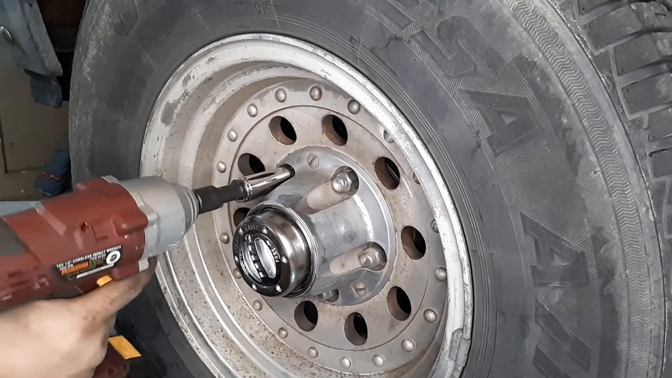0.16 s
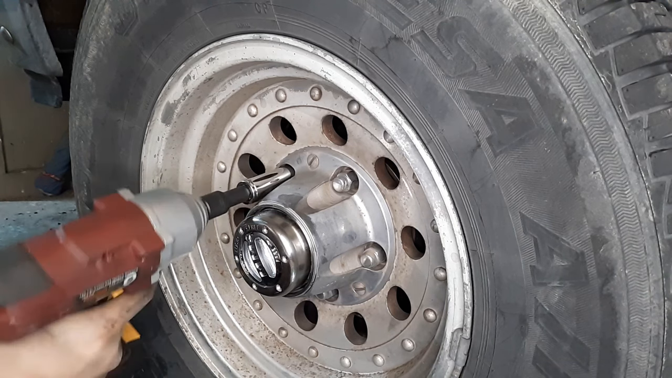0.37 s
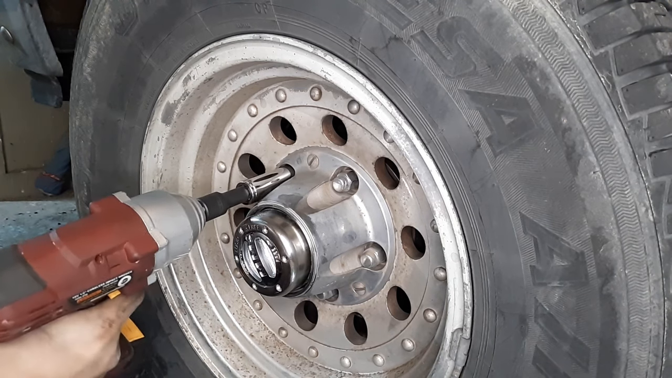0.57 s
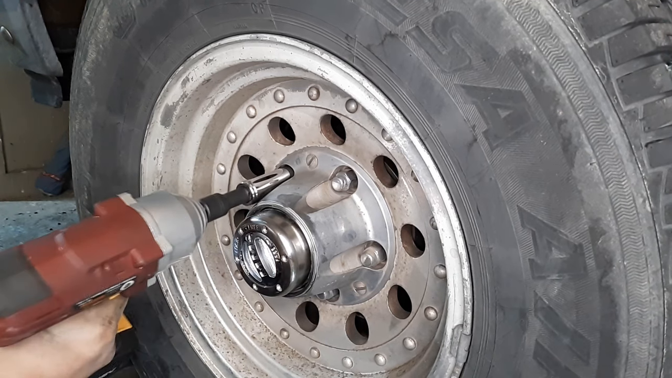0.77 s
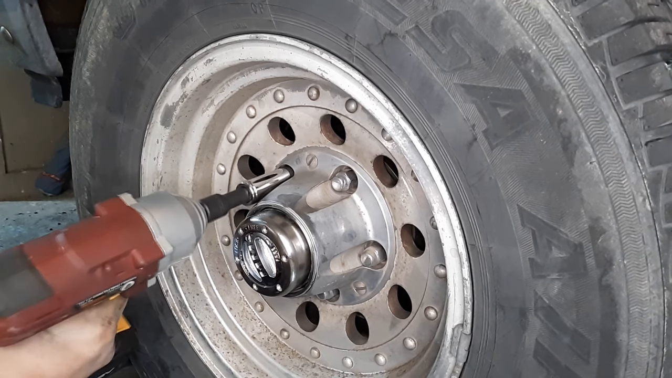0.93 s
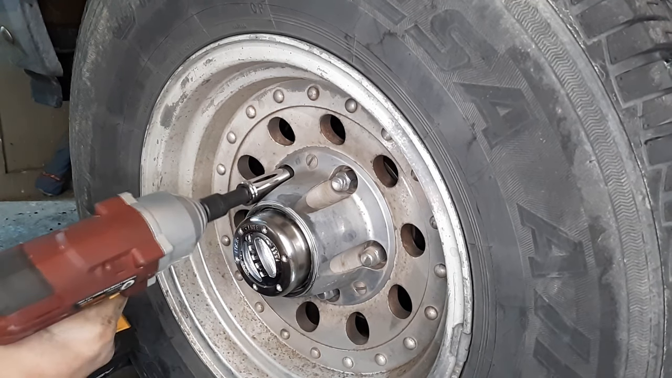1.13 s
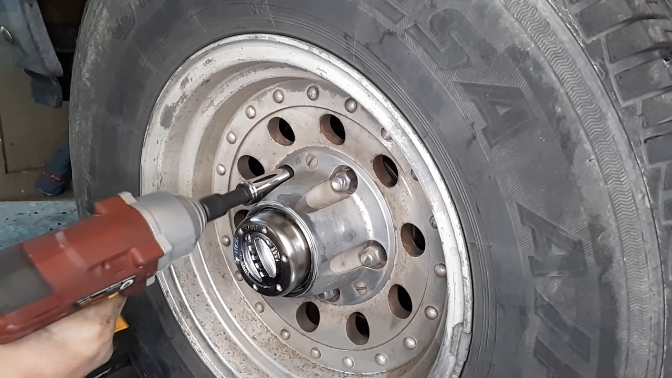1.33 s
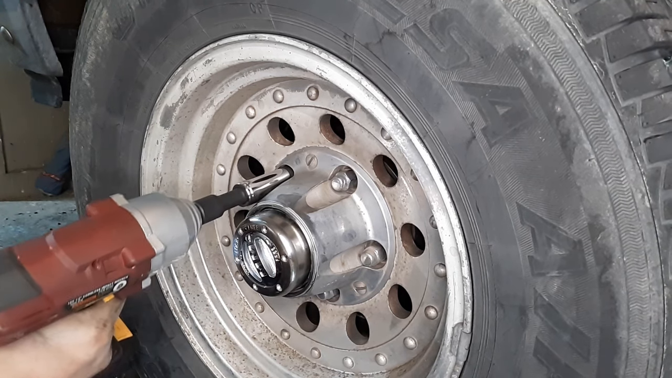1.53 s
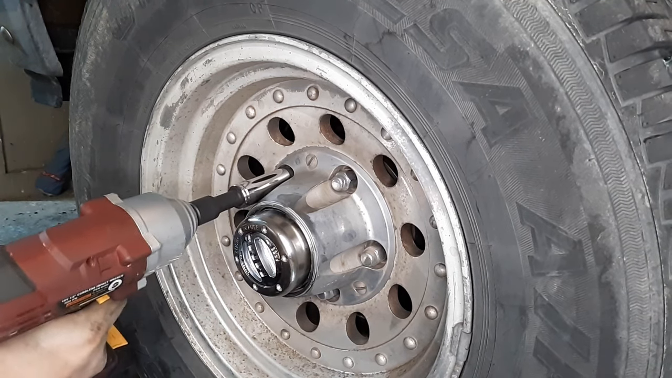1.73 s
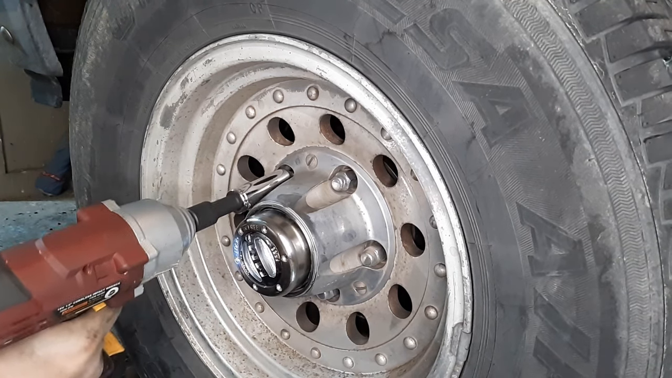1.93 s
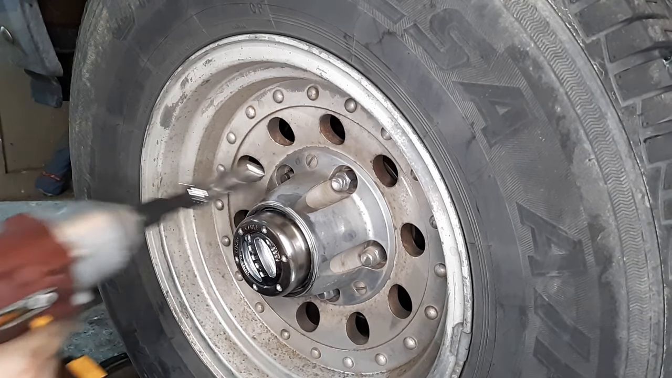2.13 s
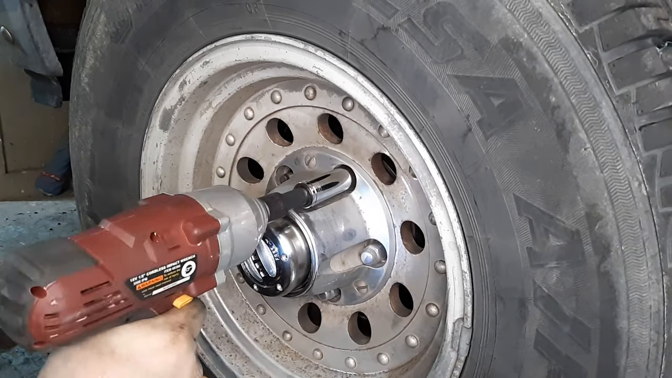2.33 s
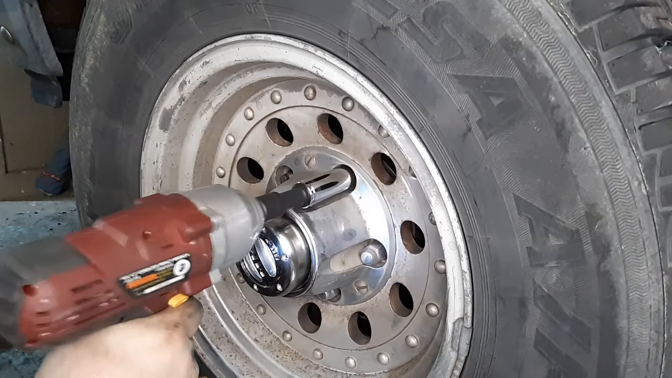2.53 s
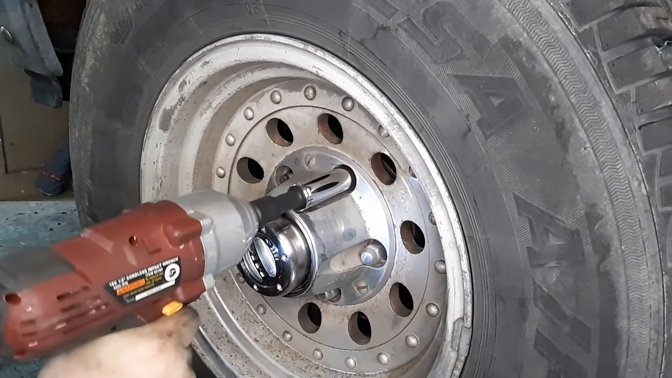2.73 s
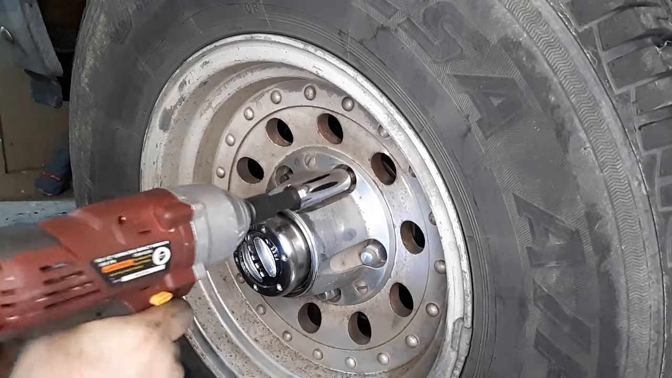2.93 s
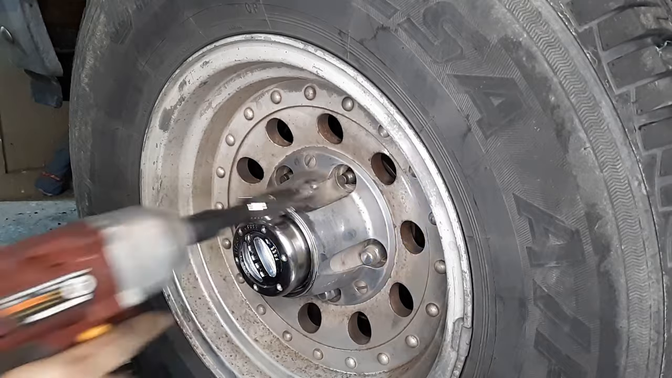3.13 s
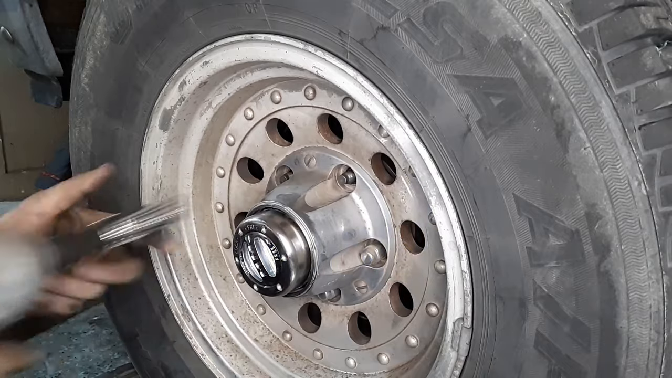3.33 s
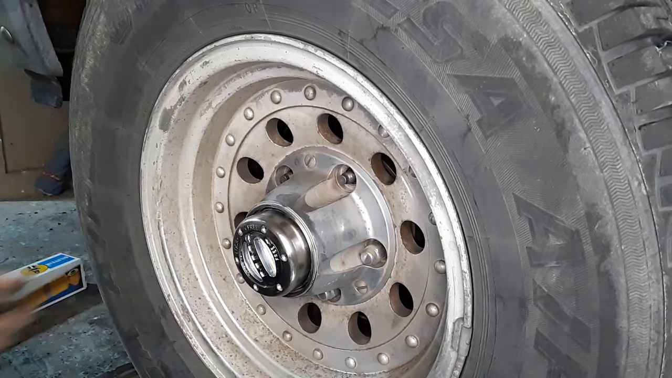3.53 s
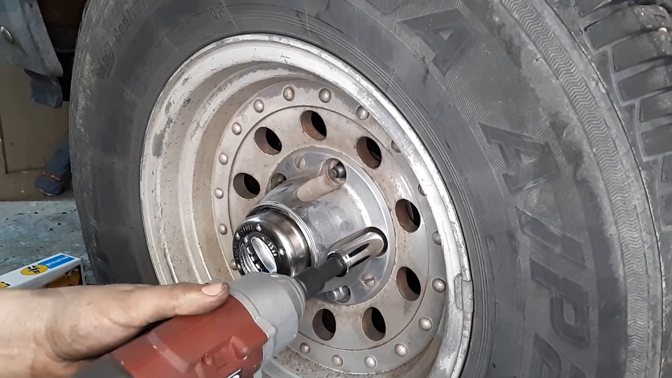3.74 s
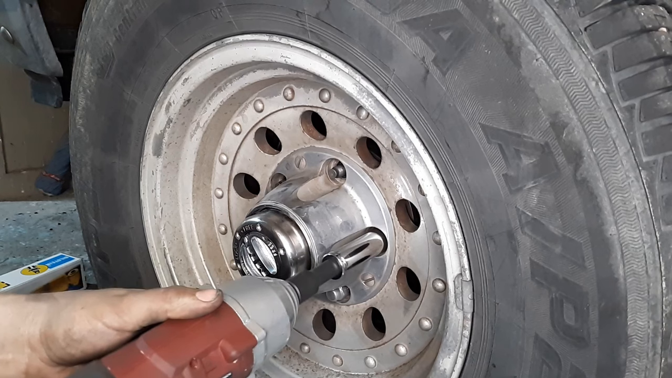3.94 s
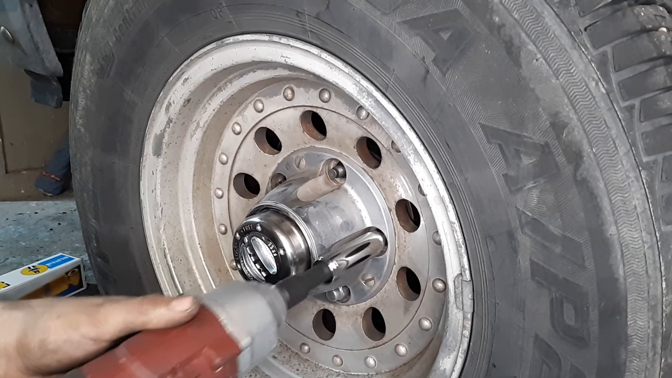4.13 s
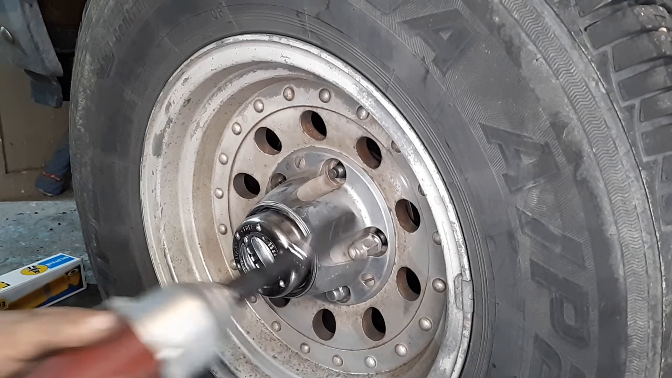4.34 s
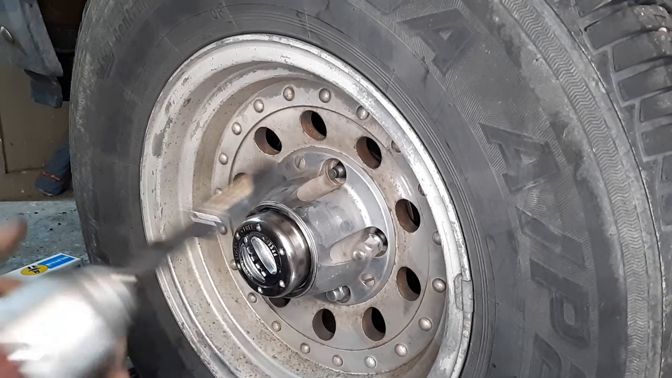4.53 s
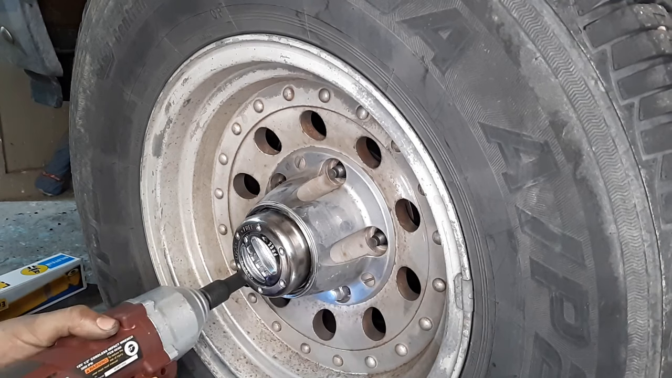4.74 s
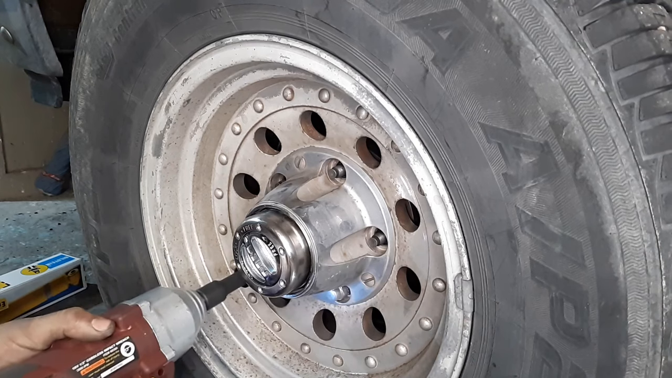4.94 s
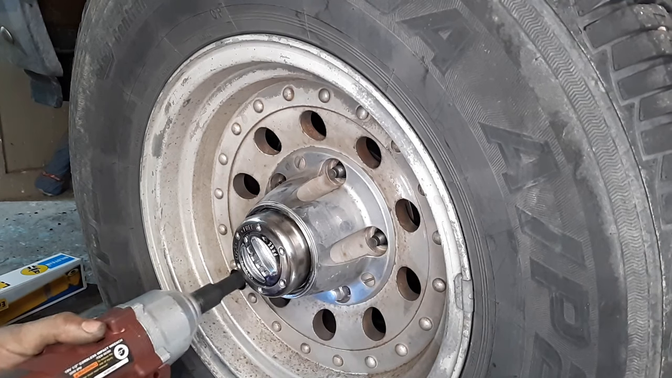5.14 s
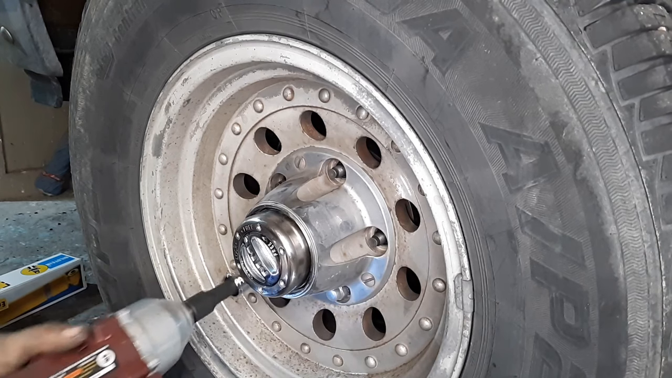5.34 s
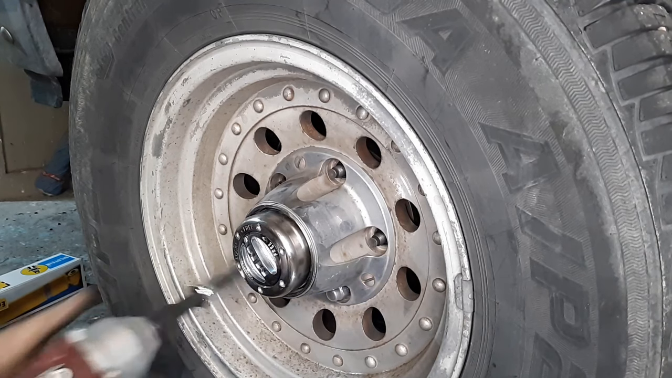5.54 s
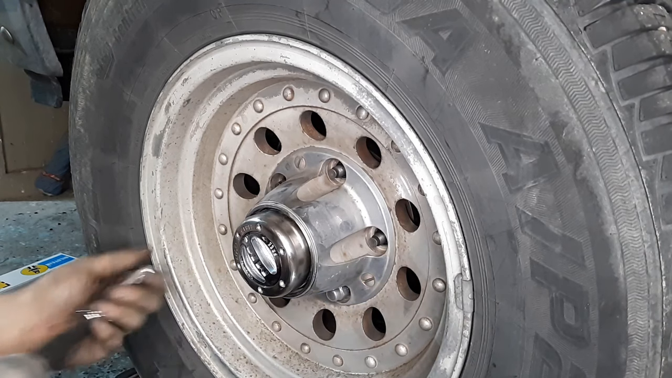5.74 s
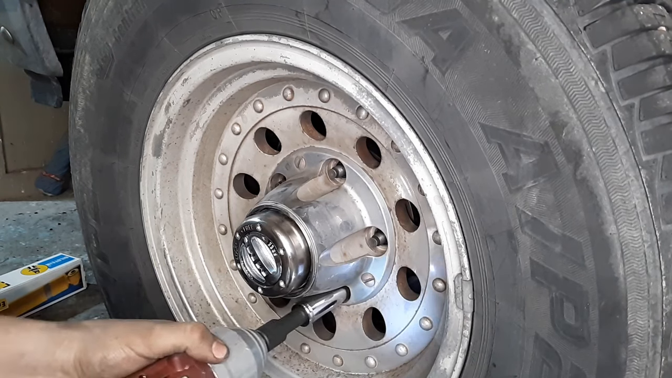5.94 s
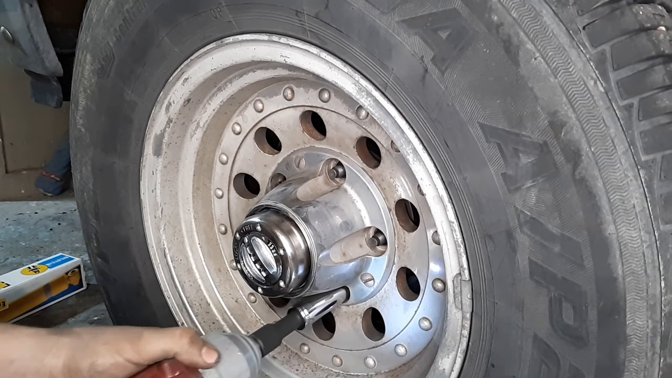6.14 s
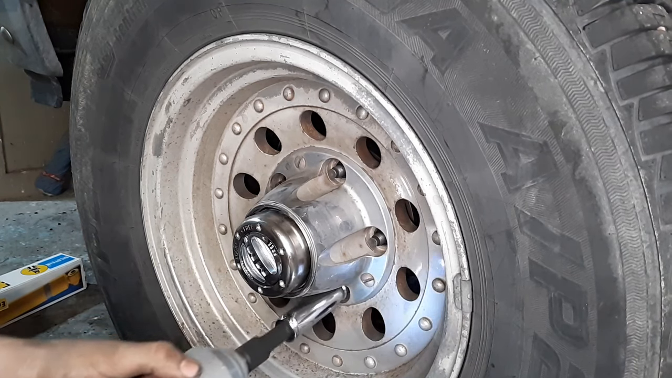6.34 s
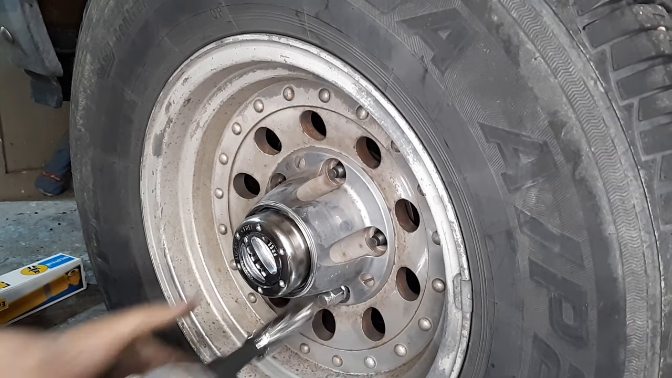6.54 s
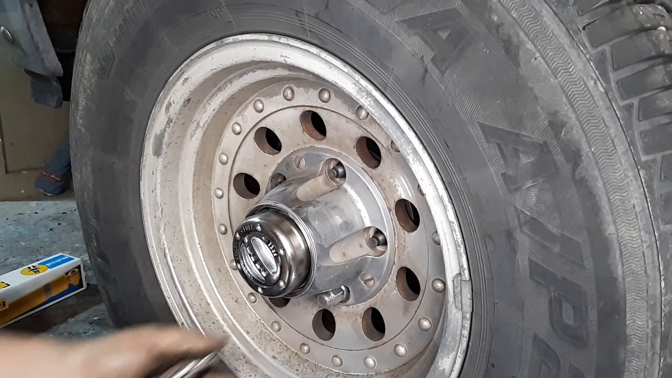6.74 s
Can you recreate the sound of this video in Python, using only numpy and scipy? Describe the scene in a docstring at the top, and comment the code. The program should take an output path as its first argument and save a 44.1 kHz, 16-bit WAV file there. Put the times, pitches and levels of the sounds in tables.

```python
"""A cordless impact wrench takes lug nuts off a truck wheel in a garage, nut after nut.
Hammer: about 40 gritty cracks a second, each ringing the anvil modes, until the nut breaks free.
Free nut: grind with brief dropouts about once a turn, over fan whirr and gear whine.
Stops and contacts: bursts of grit as the brake grabs; decaying sines as socket, wheel and loose parts ring.
Behind: faint handling rustle, garage reverb of banded noise, steady hush."""
import sys
import numpy as np
from scipy import signal
from scipy.fft import rfft, irfft
from scipy.io import wavfile

SR = 44100
rng = np.random.default_rng(int(sys.argv[2]) if len(sys.argv) > 2 else 0)


def wav_out(sig):
    """Save sig, one row per channel (or a flat mono array), as 16-bit PCM at SR to the path in sys.argv[1]."""
    wavfile.write(sys.argv[1], SR, np.round(np.clip(np.atleast_2d(sig).T, -1, 1) * 32767).astype(np.int16))


N = 299570


def from_db(db):
    """Amplitude ratio of a level in dB."""
    return 10 ** (np.asarray(db) / 20)


def rms_one(x):
    """Scales to rms 1."""
    return x / np.sqrt(np.mean(x ** 2) + 1e-20)


def at_hz(points, hz):
    """Interpolates (f, value) points over log frequency."""
    points_hz, values = np.array(points).T
    return np.interp(np.log(hz), np.log(points_hz), values)


def drift(rate_hz):
    """Slow random wander, rms about 1: two-pole lowpassed noise at one point per 40 samples."""
    r = np.exp(-80 * np.pi * rate_hz / SR)
    noise = rng.standard_normal(N // 40 + 2002)
    slow = signal.lfilter([1], [1, -2 * r, r * r], noise)[2000:]   # drop the filter's run-in
    return np.interp(np.arange(N) / 40, np.arange(len(slow)), rms_one(slow))


def coloured(x, spectrum, size=2048):
    """Causal (minimum-phase) filter of the given spectrum; keeps the power of white noise."""
    hz = np.arange(size // 2 + 1) * SR / size + 1
    cepstrum = irfft(np.log(from_db(at_hz(spectrum, hz))))
    cepstrum[1:size // 2] *= 2
    cepstrum[size // 2 + 1:] = 0
    kernel = irfft(np.exp(rfft(cepstrum)))
    return signal.oaconvolve(x, kernel / np.linalg.norm(kernel))[:N]


SPLIT_HZ = 2000


def split(high, low):
    """Joins the treble of one signal to the bass of another."""
    above = signal.butter(3, SPLIT_HZ, "high", fs=SR, output="sos")
    below = signal.butter(3, SPLIT_HZ, "low", fs=SR, output="sos")
    return signal.sosfilt(above, high) + signal.sosfilt(below, low)


def ring(clicks, hz, t60_s):
    """Damped resonator: a unit click starts a decaying sine of height 1."""
    r, w = from_db(-60 / (t60_s * SR)), 2 * np.pi * hz / SR
    return signal.lfilter([0, np.sin(w)], [1, -2 * r * np.cos(w), r * r], clicks + 1e-18)


def strike(times_s, dbs, modes, spread_db):
    """Every hit excites every mode; spread_db sets the chance in each strength."""
    out, chance = np.zeros(N), rng.standard_normal((len(times_s), len(modes)))
    at = (np.asarray(times_s) * SR).astype(int)
    for k, (hz, db, t60_s) in enumerate(modes):
        clicks = np.zeros(N)
        clicks[at] = from_db(dbs + db + spread_db * chance[:, k])
        out += ring(clicks, hz, t60_s)
    return out


def bursts(times_s, dbs, hold_ms, fade_ms):
    """Envelope: each event jumps up, holds, then dies away exponentially."""
    out, ms = np.zeros(N), np.arange(SR // 10) * 1000 / SR
    for s, db, hold in np.broadcast(times_s, dbs, hold_ms):
        i = int(s * SR)
        shape = from_db(db) * np.exp(-np.maximum(ms - hold, 0) / fade_ms)
        out[i:i + len(ms)] += shape[:N - i]
    return out


def grit(spread_db):
    """Dense metal contacts: white noise with random sample-to-sample size; rms 1."""
    size_db = spread_db * np.minimum(rng.exponential(1, N), 4)
    return rms_one(rng.standard_normal(N) * from_db(size_db))


# garage hush spectrum: f/Hz, density/dB per Hz (relative)
AIR = [(24, -42), (40, -31), (100, -17), (189, -9), (395, -17), (502, -22), (4000, -27.5), (9000, -37.5),
       (15600, -68), (22000, -120)]
AIR_DB = -71


def hush():
    """Garage air: steady coloured noise."""
    return from_db(AIR_DB) * coloured(rng.standard_normal(N), AIR)


# garage decay: f/Hz, t60/s
GARAGE_T60 = [(150, 0.66), (1000, 0.28), (4000, 0.2), (9000, 0.26), (15000, 0.016)]
GARAGE_DB = -12.5
LATE_DB, LATE_STRETCH = -15.5, 2.5   # faint slower part of the tail: level, decay time ratio


def garage(x):
    """Diffuse reverb: octave bands of noise, each dying at its own rate."""
    t, tail = np.arange(int(.7 * SR)) / SR, 0
    for hz in 90 * 2. ** np.arange(8):
        band = signal.butter(2, [hz / np.sqrt(2), hz * np.sqrt(2)], "band", fs=SR, output="sos")
        fall_db = -60 * t / at_hz(GARAGE_T60, hz)
        decay = from_db(fall_db) + from_db(LATE_DB + fall_db / LATE_STRETCH)
        tail = tail + signal.sosfilt(band, rng.standard_normal(len(t))) * decay
    tail = tail * (1 - np.exp(-t / 0.0005))
    return from_db(GARAGE_DB) * signal.oaconvolve(x, tail / np.linalg.norm(tail))[:N]


# handling of the tool: t/s, level/dB
RUSTLE = [(0.372, -47.5), (0.501, -69.5), (0.719, -78.5)]


def rustle():
    """Tool handled: soft uneven grit, mostly midrange."""
    s, db = np.transpose(RUSTLE)
    level_db = np.interp(np.arange(N) / SR, s, db, -200, -200)
    uneven = grit(spread_db=2.5) * from_db(level_db + 1.7 * drift(20))
    return coloured(uneven, [(300, -11.0), (1200, 3.5), (2500, -23.5)])


# socket bumps the wheel: t/s, level/dB
WHEEL_HITS = [(0.01, -33), (0.357, -39)]
# wheel modes: f/Hz, level/dB (added to hit), t60/s
WHEEL = [(190, -4, 0.12), (502, -14, 1.0), (800, 3, 0.1)]


def wheel():
    """Each bump rings the damped wheel modes."""
    return strike(*np.transpose(WHEEL_HITS), WHEEL, spread_db=0)


# free socket struck: t/s, level/dB
PINGS = [(4.212, -43), (4.306, -42.5), (6.395, -34.5)]
# close socket modes that beat: f/Hz, level/dB (added to hit), t60/s
SOCKET = [(11884, 7.5, 0.59), (11862, -2, 0.7), (11900, -20, 0.52)]


def socket():
    """The free socket sings: close high modes beat as they decay."""
    return strike(*np.transpose(PINGS), SOCKET, spread_db=0)


# short clanks of loose parts, and one brief high ring of the socket: t/s, f/Hz, level/dB (before wobble), t60/s
CLANKS = [(0.078, 990, -17.5, 0.011), (0.3573, 1013, -14.5, 0.044), (0.3593, 423, -15, 0.017),
          (2.042, 1190, -26, 0.1), (2.087, 1014, -35.5, 0.19), (2.085, 11800, -44, 0.22),
          (3.024, 1157, -22, 0.21), (3.022, 3960, -26, 0.17), (3.078, 966, -28.5, 0.11),
          (5.383, 1170, -22, 0.1), (5.53, 1080, -25, 0.07), (6.52, 1120, -26, 0.19),
          (6.533, 1394, -22, 0.087), (6.544, 970, -28, 0.11), (6.72, 1970, -35.5, 0.017)]
CLANK_WOBBLE_DB = 3


def clanks():
    """Each clank is one dying tone, roughened as the parts still touch."""
    out, t = np.zeros(N), np.arange(SR // 3) / SR
    for s, hz, db, t60_s in CLANKS:
        i = int(s * SR)
        tone = from_db(db - 60 * t / t60_s) * np.sin(2 * np.pi * hz * t)
        out[i:i + len(t)] += tone[:N - i]
    return out * from_db(CLANK_WOBBLE_DB * drift(70))


# spectrum of blows and contacts: f/Hz, density/dB per Hz (relative)
BLOW_COLOUR = [(150, -42), (300, -11), (614, -17.5), (1300, -8), (3830, 0), (9090, -12.5), (11700, -10.5),
               (16000, -21)]


def contacts(table, hold_ms, fade_ms):
    """Metal on metal: gritty broadband bursts, bass level set apart from treble."""
    s, db, low_db = np.transpose(table)
    shapes = [bursts(s, level_db, hold_ms, fade_ms) for level_db in (db, db + low_db)]
    high, low = grit(spread_db=-2.0) * shapes
    return from_db(-13.0) * coloured(split(high, low), BLOW_COLOUR)


# single contacts of socket, nut and stud: t/s, level/dB (relative), low part/dB (re level)
CLACKS = [(.0123, -6, 13.5), (.0294, -6, 15), (.0674, -10.5, -11), (.0797, -24, 24.5), (.0944, -15.5, 9),
          (.1378, -35.5, 30), (.3585, -13, 13.5), (2.0835, -6.5, 3), (2.3705, -7.5, -2), (2.808, -5.5, -9),
          (3.077, -28.5, 26), (3.3692, -36.5, 5), (3.3914, -39.5, 18.5), (3.4885, -36.5, 18.5),
          (3.6048, -5.5, 10), (4.171, -10, -5), (4.3048, -11.5, 8.5), (5.382, -4, 0), (5.5862, -12.5, 7.5),
          (5.606, -31, -14), (5.7135, -13, -42), (5.7355, -26, 4.5), (5.772, -33, 4), (5.8395, -8, 11),
          (6.395, -10.5, -5), (6.558, -17, 0), (6.722, -47, 25)]


def clacks():
    """Socket, nut and stud touch: one short burst each."""
    return contacts(CLACKS, hold_ms=3.53, fade_ms=0.65)


# brake grabs: t/s, level/dB (relative), low part/dB (re level)
BRAKES = [(2.0375, -13, 8), (3.017, -7.5, -0.5), (4.2517, -8.5, 6), (5.5273, -10.5, 0.5),
          (6.5195, -8.5, 3.5)]


def brakes():
    """The brake grabs and the nut chatters to a stop: a longer burst each."""
    return contacts(BRAKES, hold_ms=19.3, fade_ms=1.9)


# gear whine of the free-spinning tool: start t/s, trigger off t/s, end t/s, level/dB (before wobble)
WHINE = [(1.45, 1.98, 2.03, -42), (3.86, 4.16, 4.25, -40), (5.39, 5.36, 5.52, -38), (5.97, 6.44, 6.51, -41)]
WHINE_HZ, WHINE_SAG_HZ_PER_S, WHINE_OCTAVE_DB = 4450, 3600, -14   # frequency before waver


def whine():
    """Gears: a wavering tone and its octave, gliding down as the motor coasts."""
    t = np.arange(N) / SR
    hz, gain = np.full(N, float(WHINE_HZ)), np.zeros(N)
    for start, off, end, db in WHINE:
        on = (t > start) & (t < end)
        hz[on] -= WHINE_SAG_HZ_PER_S * np.maximum(t[on] - off, 0)
        gain[on] = from_db(db)
    waver = 1 + .007 * drift(63) + .008 * drift(6)
    phase = np.cumsum(hz * waver) * 2 * np.pi / SR
    tone = np.sin(phase) + from_db(WHINE_OCTAVE_DB) * np.sin(2 * phase)
    return gain * from_db(3 * drift(25)) * tone


# trigger held, one table per pull: t/s, gear and thread grind/dB, its low part/dB, fan whirr/dB
# (levels before rattle and drift)
RUNS = [
    [(0, -17, -19, -36.5), (.045, -22.5, -17.5, -44.5), (.06, -36, -28, -42.5), (.15, -41.5, -37.5, -83)],
    [(.801, -23.5, -19, -33), (1.41, -23.5, -20, -33.5), (1.46, -29, -28, -32.5), (1.75, -34, -32, -36),
     (2.04, -38.5, -36.5, -41.5), (2.07, -45, -44.5, -49.5)],
    [(2.371, -26.5, -20, -25), (2.52, -28.5, -28, -34), (2.67, -30, -28.5, -31), (3.02, -32.5, -30.5, -39),
     (3.06, -51, -38, -66)],
    [(3.604, -25.5, -22, -43.5), (3.82, -30.5, -29, -36), (3.87, -29.5, -28.5, -36.5),
     (4.25, -35.5, -35, -37), (4.29, -36, -31, -34)],
    [(4.672, -25.5, -24, -36), (4.92, -28, -27.5, -38.5), (5.27, -27.5, -26.5, -38.5),
     (5.31, -32, -32, -40), (5.53, -37.5, -36, -41), (5.57, -49, -34, -67)],
    [(5.838, -22.5, -18, -50), (6.1, -27.5, -27, -37.5), (6.14, -30, -32, -44), (6.51, -33, -32.5, -38.5),
     (6.57, -32.5, -25.5, -59)],
]


def effort():
    """Trigger: gains of grind, its low part and the fan; practically nothing between pulls."""
    t, gains = np.arange(N) / SR, np.zeros((3, N))
    for rows in RUNS:
        s, *columns = np.transpose(rows)
        gains += [from_db(np.interp(t, s, db, -200, -200)) for db in columns]
    return gains


# loose nut loses touch with the socket wall, about once a turn: t/s
BREAKS = [1.49, 1.523, 1.56, 1.604, 1.646, 1.678, 1.724, 1.751, 1.771, 1.796, 1.825, 1.855, 1.889, 1.92,
          1.948, 1.972, 2.528, 2.565, 2.592, 2.637, 2.691, 2.717, 2.751, 2.766, 2.799, 2.815, 2.846, 2.884,
          2.935, 2.963, 3.013, 3.835, 3.88, 3.925, 3.96, 4.014, 4.058, 4.09, 4.135, 4.167, 4.238, 4.928,
          4.971, 5.012, 5.053, 5.092, 5.135, 5.163, 5.21, 5.294, 5.324, 5.346, 5.378, 5.464, 5.489, 5.97,
          6.047, 6.136, 6.177, 6.209, 6.251, 6.283, 6.333, 6.382, 6.417, 6.465, 6.51]
RATTLE_DB, FREE_AFTER_S = 2.5, .03
BREAK_DB, BREAK_SPREAD_DB, BREAK_S = 10, 1.5, .0049   # dip depth, its chance, half width at 1/e


def rattle():
    """Gain of the grind: louder once the nut is free and rattles, dipping where it loses touch."""
    t = np.arange(0, N, 32) / SR
    hammering = sum((t > first - FREE_AFTER_S) & (t < last + FREE_AFTER_S) for first, last, *_ in HAMMERING)
    db = RATTLE_DB * (1 - hammering) * (t > HAMMERING[0][0])
    for s, chance in zip(BREAKS, rng.standard_normal(len(BREAKS))):
        db = db - (BREAK_DB + BREAK_SPREAD_DB * chance) * np.exp(-((t - s) / BREAK_S) ** 2)
    return from_db(np.repeat(db, 32)[:N])


# tool body resonances: f/Hz, width/Hz, then level/dB in each pull (before wander)
TOOL = [(1530, 730, -19.5, -22.5, -16.5, -3.5, -8, -6), (6020, 110, -13.5, -2.5, -0.5, -9.5, 5, -5),
        (7000, 4000, -22, -13, -7.5, -8.5, -8, -20)]
# socket and nut modes as the nut shifts its seat, plus one band at the gear whine's pitch (4380 Hz, 1.46-1.95
# s): start t/s, end t/s, f/Hz, level/dB (before wander)
SEATS = [(0, .1, 3200, 0), (.8, 1.4, 3760, -4), (1.5, 1.82, 2600, 4), (1.5, 1.72, 1550, -1),
         (1.48, 1.7, 3070, 0), (1.46, 1.95, 4380, 1), (1.74, 2.0, 3530, 1), (2.37, 2.52, 3830, 1),
         (2.5, 2.66, 3050, 3), (2.68, 3.0, 3520, 1), (2.62, 3.0, 3990, -1), (2.62, 2.95, 1620, -2),
         (3.6, 3.84, 1400, -1), (3.6, 3.79, 2500, 0), (4.67, 4.84, 3720, -3), (5.05, 5.28, 2720, -1),
         (5.9, 6.14, 1430, -4), (6.15, 6.5, 2950, -4), (6.12, 6.5, 2170, -4)]
SEAT_WIDTH_HZ, SEAT_FADE_S = 75, .05


def tool_body(x, wander_db):
    """Resonances of tool, socket and nut, and a band at the gear whine's pitch: each a close pair, strengths
    wandering as the contact point moves."""
    out, t = x.copy(), np.arange(N) / SR
    pull = np.searchsorted([rows[0][0] for rows in RUNS], t, "right") - 1
    modes = [(hz, width_hz, from_db(dbs)[pull]) for hz, width_hz, *dbs in TOOL]
    for start, end, hz, db in SEATS:
        fade = np.clip(np.minimum(t - start, end - t) / SEAT_FADE_S + 1, 0, 1)
        modes.append((hz, SEAT_WIDTH_HZ, from_db(db) * fade))
    for centre_hz, width_hz, gain in modes:
        r, on = np.exp(-np.pi * width_hz / SR), gain > 0
        for hz in centre_hz * np.array([.988, 1.012]):
            poles = [1, -2 * r * np.cos(2 * np.pi * hz / SR), r * r]
            mode = signal.lfilter([1 - r, 0, r - 1], poles, x[on] + 1e-18)
            out[on] += mode * gain[on] * from_db(wander_db * drift(48)[on])
    return out


# grind spectrum: f/Hz, density/dB per Hz (relative)
GRIND_COLOUR = [(90, -31.5), (200, -13), (480, -13), (800, -8), (1400, -5), (3620, 1.5), (9400, -14.5),
                (16000, -22)]
# fan whirr spectrum: f/Hz, density/dB per Hz (relative)
WHIRR_COLOUR = [(9500, -18.5), (11000, -1), (12300, -1), (13500, -14.5), (16000, -33.5)]


def motor(high, low, whirr):
    """Gear and thread grit under the rattle of the nut, plus the smooth noise of the fan."""
    contact = grit(spread_db=2.5) * rattle() * from_db(1.5 * drift(60))
    grind = coloured(split(contact * high, contact * low), GRIND_COLOUR)
    fan = coloured(rng.standard_normal(N), WHIRR_COLOUR) * whirr * from_db(1.3 * drift(29))
    return tool_body(grind, wander_db=3.5) + fan


# hammering per nut: first blow t/s, last blow t/s, first level/dB, last level/dB,
# every second blow re the others/dB (all before chance)
HAMMERING = [(0.8016, 1.419, -5, -8.5, -1.5), (2.389, 2.5103, -11, -10.5, 1.5),
             (3.623, 3.7715, -7, -5.5, -5.5), (4.6777, 4.8516, -7.5, -6.5, -2),
             (5.862, 5.937, -3.5, -5, -5)]
BLOWS_PER_S = 40.5   # sets the whole number of gaps per nut
QUICKEN_S, BLOW_JITTER_S, BLOW_SPREAD_DB = 1.3e-5, .0004, -0.4   # gaps shrink a little blow by blow


def blow_times():
    """Times and levels of all blows: nearly even gaps, the two hammer jaws taking turns."""
    rows = []
    for first, last, first_db, last_db, second_db in HAMMERING:
        k = np.arange(round((last - first) * BLOWS_PER_S) + 1)
        share, chance = k / k[-1], rng.standard_normal((len(k), 2))
        s = first + (last - first) * share
        s = s + QUICKEN_S * k * (k[-1] - k) + BLOW_JITTER_S * chance[:, 0]
        db = first_db + (last_db - first_db) * share
        db = db + second_db * (k % 2) + BLOW_SPREAD_DB * chance[:, 1]
        rows += zip(s, db)
    return np.transpose(rows)


# anvil, wheel and tyre modes: f/Hz, level/dB (added to blow), t60/s
ANVIL = [(204, -28.5, 0.055), (497.8, -32.5, 0.22), (3230, -10.5, 0.0077), (3790, -8, 0.015),
         (4180, -6.5, 0.0076), (6540, -11, 0.021)]


def hammer(low_share):
    """Hammer on anvil: a crack of a few ms per blow, bass following the pull's grind, plus modal ring."""
    s, db = blow_times()
    crack = grit(spread_db=2.5) * bursts(s, db - 1.5, hold_ms=1.58, fade_ms=2.11)
    crack = coloured(split(crack, crack * low_share * from_db(1.0)), BLOW_COLOUR)
    return tool_body(crack, wander_db=3.5) + strike(s, db, ANVIL, spread_db=5.5)


def scene():
    """Sums the sources; clanks, socket and hush bypass the reverb."""
    high, low, whirr = effort() + 1e-12
    near = hammer(low / high) + motor(high, low, whirr) + whine() + rustle()
    near += clacks() + brakes() + wheel()
    return (near + garage(near) + clanks() + socket() + hush())[None]


OVERLOAD, MIC_LOW_HZ, CUTOFF_HZ = .48, 87.5, 16400


def record(dry):
    """The loudest peaks flatten towards the overload level; deep bass and the top are cut."""
    flat = dry / (1 + np.abs(dry / OVERLOAD) ** 6.0) ** (1 / 6.0)
    flat = signal.sosfilt(signal.butter(2, MIC_LOW_HZ, "high", fs=SR, output="sos"), flat)
    return signal.sosfilt(signal.cheby2(14, 45, CUTOFF_HZ, fs=SR, output="sos"), flat)


dry = scene()
out = record(dry)
wav_out(out)
```